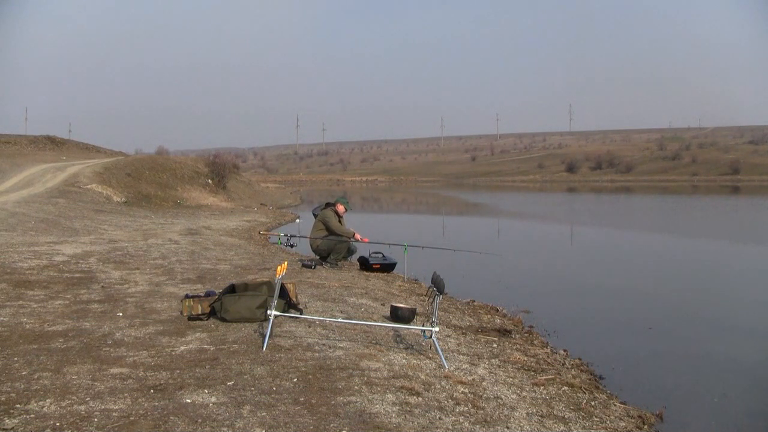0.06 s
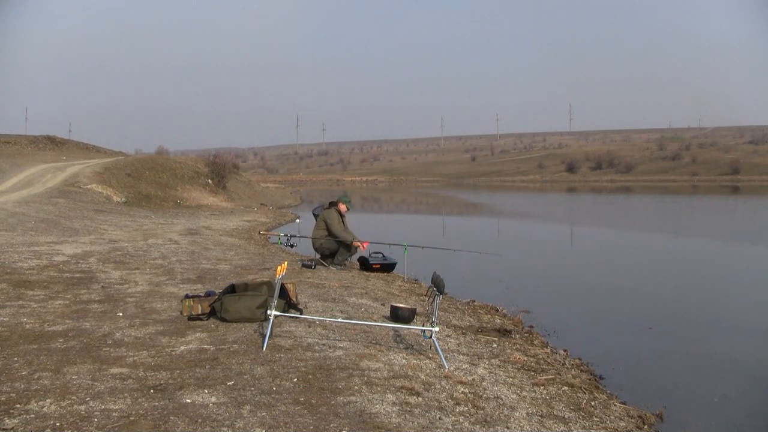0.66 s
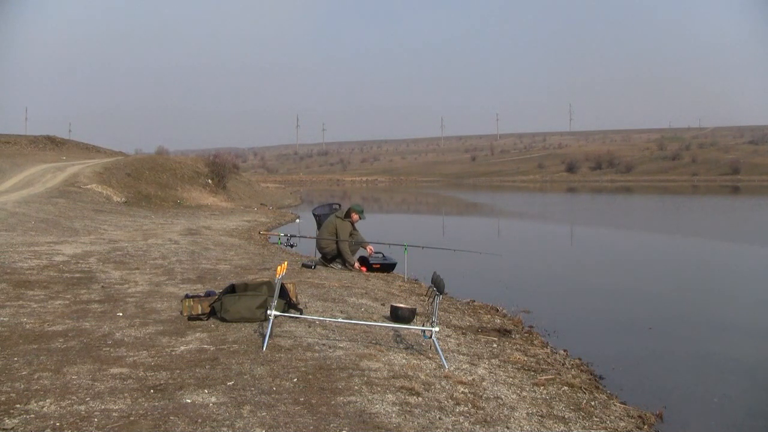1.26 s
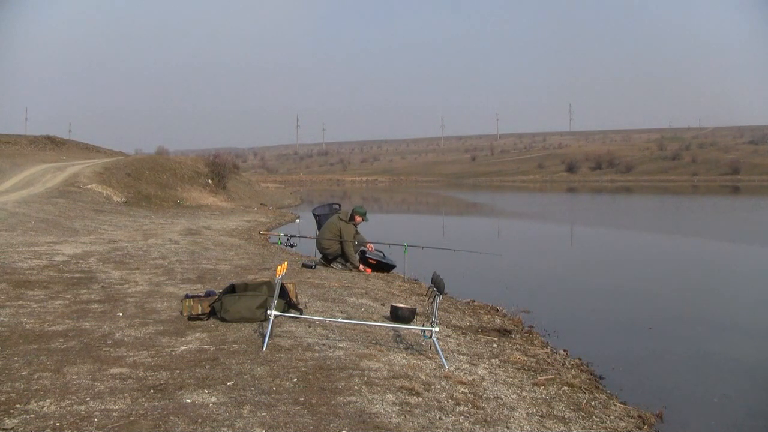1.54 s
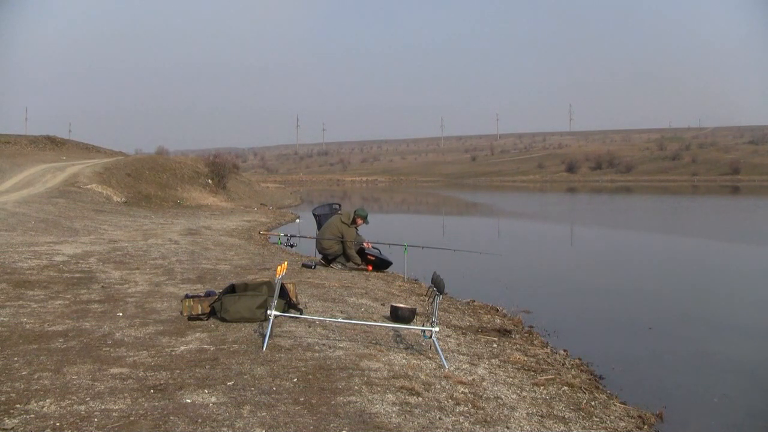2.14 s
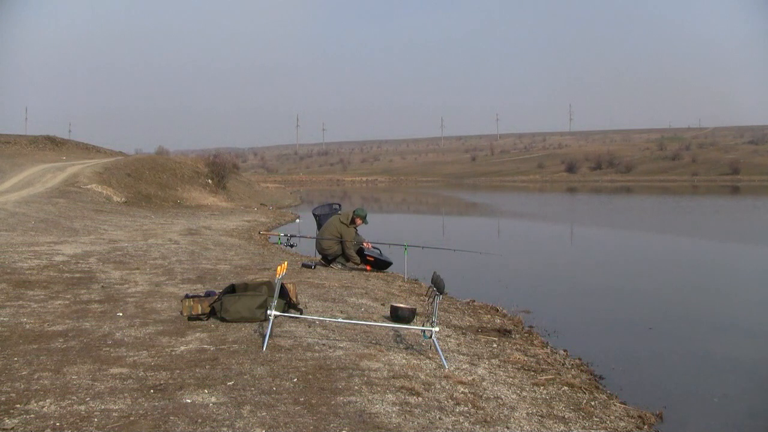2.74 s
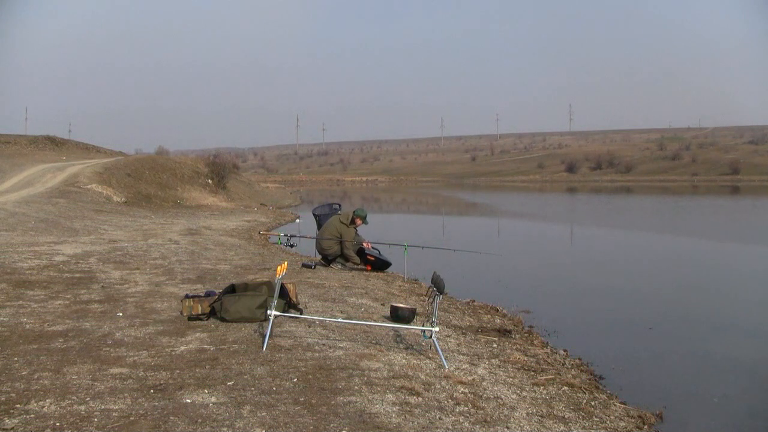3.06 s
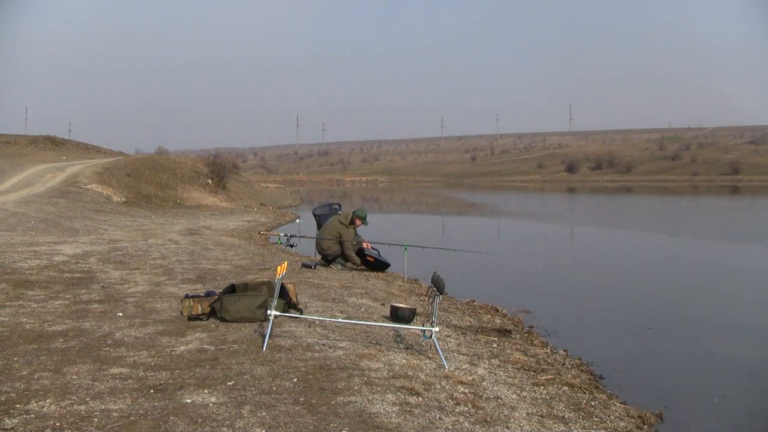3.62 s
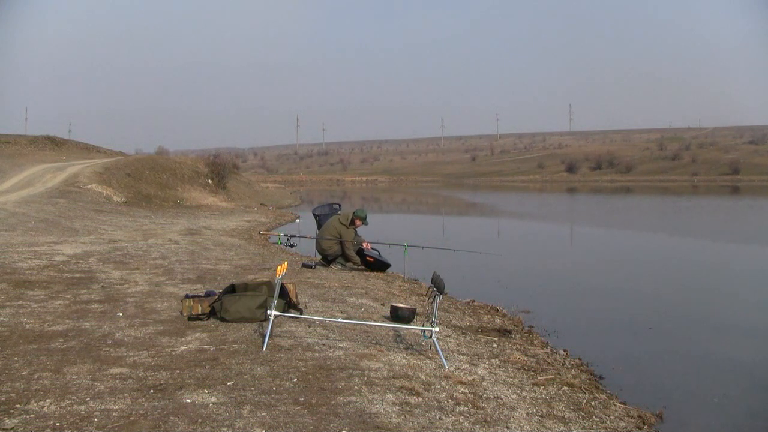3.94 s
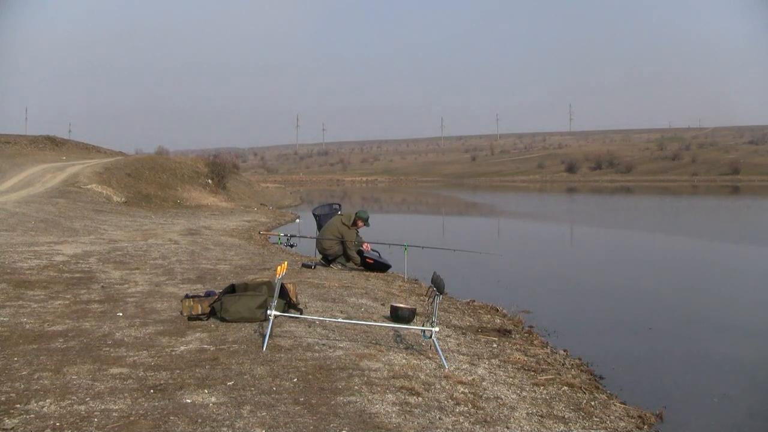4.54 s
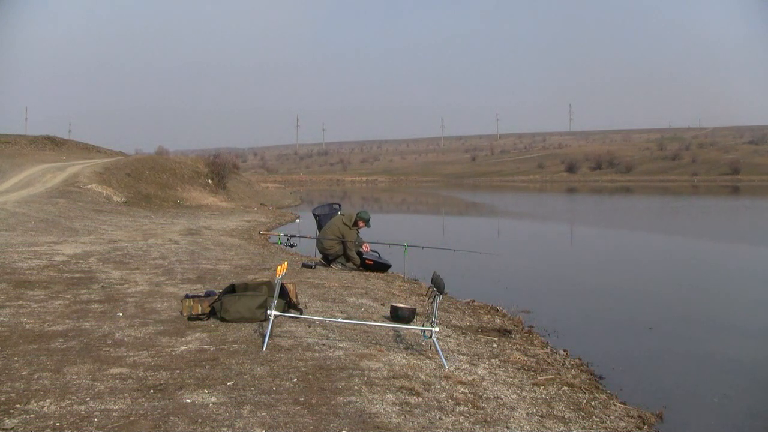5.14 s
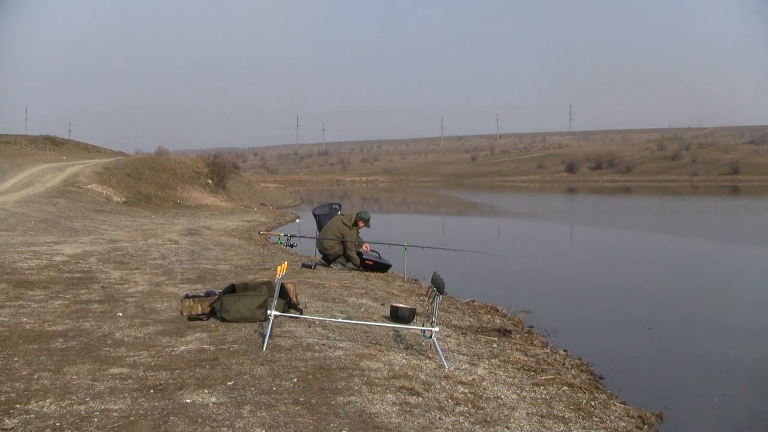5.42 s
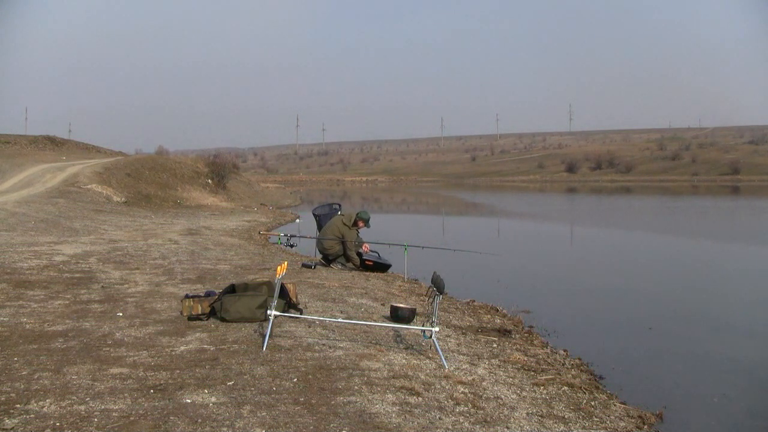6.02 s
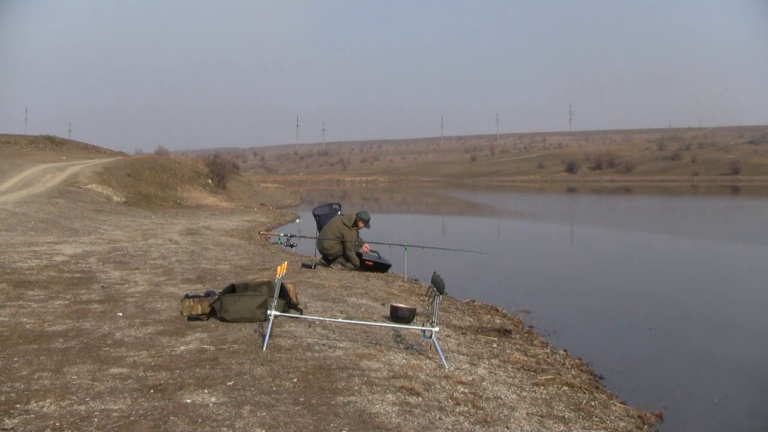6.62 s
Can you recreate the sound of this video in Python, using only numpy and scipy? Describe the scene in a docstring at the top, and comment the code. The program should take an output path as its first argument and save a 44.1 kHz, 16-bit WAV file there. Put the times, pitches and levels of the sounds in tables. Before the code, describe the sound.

A hollow plastic tackle box knocks and clicks some metres away, small parts sliding on its trays, with a soft outdoor hush behind.

```python
"""A light gust brushes the microphone, then things slide and bump softly in a plastic tackle box.
Some metres ahead, an angler crouches by a still pond and rummages: lid and latches snap and rebound,
small parts clack on the trays, and the hollow box rings with each blow and each slip.
Open air gives back only a short scatter from the ground and a faint dull tail, over a soft wide hush."""
import sys
import numpy as np
from scipy import signal
from scipy.fft import rfft, irfft
from scipy.io import wavfile

SR = 44100
rng = np.random.default_rng(int(sys.argv[2]) if len(sys.argv) > 2 else 0)


def master(y):
    """Save y as 16-bit WAV."""
    cut = np.clip(np.atleast_2d(y).T, -1, 1)
    pcm = np.round(cut * 32767)  # scale
    wavfile.write(sys.argv[1], SR, pcm.astype(np.int16))


N = 303408
RING_S = np.arange(SR // 4) / SR  # time axis of one ring

# Lid and latches snapping. Each row: start in seconds, floor thud in dB, wall knock in dB, wall pitch
# in Hz, clack in dB, clack pitch in Hz, tick in dB, factor on ring time, rebound gap in seconds,
# loss per rebound in dB.
SNAPS = [(2.098, -63, -57, 800, -52.5, 3080, -60.5, 1, .009, 14),
         (2.175, -45.5, -38, 624, -55.5, 2740, -63.5, 0.71, .010, 27),
         (2.2143, -41.5, -36.5, 495, -49.5, 4050, -48.5, 0.81, 0.019, 11.5),
         (2.4211, -48.5, -46, 566, -52.5, 3940, -58.5, 0.56, .013, 7),
         (2.857, -78, -72, 900, -75, 2500, -73, 0.46, 0.036, 0),
         (2.924, -54, -28.5, 557, -38.5, 2900, -36, 1, 0.022, 20),
         (3.452, -56, -36.5, 568, -55, 2030, -57, .55, .017, 3.5),
         (3.8014, -59, -37.5, 750, -38.5, 3450, -45, 1, 0.021, 4.5),
         (4.782, -51.5, -45, 610, -55.5, 4320, -61, 1, 0.017, 6)]
# A hand or something soft on the box. Each row: start in seconds, wall knock in dB, wall pitch in Hz.
BUMPS = [(0.55, -58.5, 824), (0.611, -53.5, 604), (0.632, -53.5, 810), (1.365, -60.5, 1490),
         (1.458, -57, 517), (2.567, -44.5, 670), (2.58, -46, 500), (2.795, -53.5, 450), (3.453, -41.5, 314),
         (4.053, -42.5, 540), (4.182, -48, 497), (4.197, -47, 520), (5.718, -56.5, 597),
         (5.791, -53.5, 690), (6.862, -46.5, 660)]
# Small parts dropping on a tray. Each row: start in seconds, clack in dB, part pitch in Hz,
# wall pitch in Hz, tick in dB.
CLACKS = [(1.577, -66.5, 5500, 1000, -74), (2.163, -62, 4050, 640, -70), (2.706, -65, 3200, 600, -69),
          (2.9, -66, 3770, 700, -77), (3.756, -58, 4400, 593, -64), (4.002, -59, 2900, 884, -74),
          (4.071, -61, 2860, 556, -72), (4.208, -57, 3770, 600, -75), (4.218, -47, 4160, 770, -59),
          (4.257, -58, 3800, 500, -73), (4.415, -52, 2800, 835, -70.5), (4.45, -52, 4150, 940, -68),
          (4.4759, -48, 4220, 1000, -63), (4.519, -53, 2550, 920, -67.5), (4.729, -51, 4420, 940, -64.5),
          (4.76, -55, 3750, 744, -69), (4.819, -61, 3900, 520, -74), (5.309, -61, 3600, 750, -78),
          (5.332, -58, 4100, 706, -83), (5.865, -67, 3000, 700, -77), (5.9045, -45, 3050, 760, -70)]
# Things sliding over the trays. Each row: start and end in seconds, then the levels of walls,
# small parts and contact fizz in dB.
SLIDES = [(0.471, 0.68, -66.5, -74.5, -82.5), (2.151, 2.264, -55, -70, -76),
          (2.438, 2.495, -55.5, -72, -78.5), (2.658, 2.785, -58.5, -70.5, -76.5),
          (2.967, 2.99, -52.5, -65.5, -67), (3.03, 3.256, -67.5, -83, -85), (3.521, 3.626, -73, -77, -86),
          (3.729, 3.856, -54.5, -73, -77), (3.803, 3.889, -45, -58, -69), (3.889, 4.17, -59, -77, -86),
          (3.993, 4.103, -51, -64.5, -77), (4.201, 4.296, -57.5, -73, -80), (4.421, 4.542, -54.5, -64, -80),
          (4.73, 4.872, -56.5, -69, -81), (5.301, 5.359, -61.5, -67, -86), (5.779, 5.85, -55, -63, -82)]
# Modes of the hollow box. Each row: frequency in Hz, relative level in dB, t60 in seconds.
BOX_MODES = [(235, -19.5, 0.13), (330, -5, 0.13), (390.6, -6, 0.15), (474, 2, 0.067), (523, -3.5, 0.12),
             (570.3, -8, 0.16), (660.5, -7.5, 0.16), (744, -2.5, 0.09), (842, -6.5, 0.12), (946.4, 0, 0.1),
             (1107, 2.5, 0.056), (1210, -9, 0.14), (1337, 0, 0.047), (1485, -3.5, 0.075), (1664, 0, 0.042),
             (1858, -16.5, 0.2)]
# Modes of trays and small hard parts. Each row: frequency in Hz, relative level in dB, t60 in seconds.
PART_MODES = [(1990, -9.5, 0.033), (2020, 2.5, 0.064), (2695, -2.5, 0.057), (2910, -3, 0.07),
              (3106, -2, 0.05), (3267, -5, 0.022), (3330, -4, 0.064), (3800, 5.5, 0.037),
              (3920, 1.5, 0.014), (4170, -2.5, 0.055), (4350, -4.5, 0.031), (4640, -9.5, 0.047),
              (5180, 0.5, 0.017), (6100, -52, 0.032)]
# The wash of weak, closely spaced tray modes. Each row: frequency in Hz, relative level in dB.
TRAY_SPECTRUM = [(1200, -27), (1900, -1), (2350, -6.5), (2780, 1), (3450, -7.5), (4100, -8), (4700, -11),
                 (5900, -13.5), (7500, -34)]
# Hard contact of plastic on plastic. Each row: frequency in Hz, relative level in dB.
TICK_SPECTRUM = [(2000, -53), (4000, -9), (5700, -6), (6500, -2), (7300, -3.5), (8100, -3), (9200, -8),
                 (10200, -5.5), (11800, -9.5), (13000, -14), (14200, -23), (16000, -44)]
# Gusts at the microphone. Each row: start in seconds, end in seconds, level in dB.
GUSTS = [(.08, .9, -69.5), (5.493, 6.0, -76.5), (5.997, 7.2, -80)]
# Wind rumble on the microphone. Each row: frequency in Hz, relative level in dB.
BREEZE_SPECTRUM = [(20, -5), (50, -19), (80, 6.5), (120, -1.5), (200, -7.5), (500, -45)]
# The hush around the pond. Each row: frequency in Hz, relative level in dB.
HUSH_SPECTRUM = [(15, -42), (25, -21.5), (86, -11), (260, -1), (313, 1.5), (359, 1), (567, 0), (722, -2),
                 (848, -3.5), (3630, -20), (15500, -41)]
# Stereo width of the hush. Each row: frequency in Hz, correlation of left and right.
HUSH_CORRELATION = [(60, 1), (130, 0.13), (290, -0.47), (640, -0.63), (1410, -0.22), (3100, 0.16),
                    (6820, 0.14), (15000, 0.19)]


def snaps(rebounds=3, softening_db=3):
    """Hard plastic snaps home and rebounds, each time with less clack and tick against the knock."""
    out = np.zeros(N)
    for start, thud_db, wall_db, wall_hz, clack_db, part_hz, tick_db, ring, gap_s, loss_db in SNAPS:
        softness_db = 6.5 + wall_db - clack_db
        for k in range(rebounds + 1):
            dull_db = k * softening_db
            hit = blow(thud_db, wall_db, wall_hz, clack_db - dull_db, part_hz, tick_db - dull_db,
                       ring, softness_db)
            add(out, start + k * gap_s, amp(-k * loss_db) * hit)
    return out


def bumps(firm_db=-53.5, thud_db_per_octave=-23.5):
    """Soft blows sound the hollow box and hardly stir its contents."""
    out = np.zeros(N)
    for start, wall_db, wall_hz in BUMPS:
        thud_db = wall_db + thud_db_per_octave * np.log2(wall_hz / 441)  # the floor takes low bumps
        ring = 0.75 * np.exp(-0.7 * max(firm_db - wall_db, 0))  # light touches stay on and damp the box
        hit = blow(thud_db, wall_db, wall_hz, clack_db=wall_db - 21.5, part_hz=2670,
                   tick_db=wall_db - 31, ring=ring, softness_db=19)
        add(out, start, hit)
    return out


def clacks(typical_knock_db=-48.5, typical_clack_db=-49.5):
    """Small hard parts clack at their own pitch, and the box answers with a knock."""
    out = np.zeros(N)
    for start, clack_db, part_hz, wall_hz, tick_db in CLACKS:
        wall_db = typical_knock_db + 0.7 * (clack_db - typical_clack_db)
        thud_db = wall_db - 21
        hit = blow(thud_db, wall_db, wall_hz, clack_db, part_hz, tick_db,
                   ring=0.92, softness_db=4, focus_db=15.5)
        add(out, start, hit)
    return out


def slides(slips_per_s=1100, spread_db=2, thud_db=-9):
    """Sliding parts catch and slip; every slip is a tiny blow on the same box."""
    out, t = np.zeros(N), np.arange(SR // 2) / SR
    for start, end, wall_db, clack_db, fizz_db in SLIDES:
        slipping = rng.random(len(t)) < slips_per_s / SR
        size = np.minimum(rng.exponential(1, len(t)), 3)
        length_s = end - start
        stroke = np.sin(np.pi * np.minimum(t / length_s, 1)).clip(0) ** 0.29
        slips = stroke * slipping * amp(spread_db * size) * rng.choice([-1, 1], len(t))
        floor, walls = box_ring(pitch_hz=644, ring=0.29, softness_db=wall_db - clack_db, focus_db=2.5)
        box = walls + amp(thud_db) * floor
        part = part_ring(pitch_hz=3400, ring=0.41, focus_db=3, wash_focus_db=8)
        fizz = dense_ring(TICK_SPECTRUM, t60=0.022, rise_s=0.0003)
        for db, response in (wall_db, box), (clack_db, part), (fizz_db, fizz):
            rub = signal.fftconvolve(slips, response)
            power = np.sum(rub ** 2) / (length_s * SR)
            add(out, start, amp(db) * rub / np.sqrt(power + 1e-20))
    return out


def blow(thud_db, wall_db, wall_hz, clack_db, part_hz, tick_db, ring, softness_db, focus_db=6):
    """One blow rings floor, walls and a small part, and the contact ticks; ring scales decay times."""
    ring = max(ring, 0.2)
    floor, walls = box_ring(wall_hz, ring, softness_db)
    part = part_ring(part_hz, ring, focus_db, wash_focus_db=0.73 * focus_db)
    tick = dense_ring(TICK_SPECTRUM, t60=0.039 * ring, rise_s=0.0005, tail_db=-38)
    return amp(thud_db) * floor + amp(wall_db) * walls + amp(clack_db) * part + amp(tick_db) * tick


def box_ring(pitch_hz, ring, softness_db, focus_db=6.5, floor_top_hz=430,
             floor_rise_s=0.0039, wall_rise_s=0.0016, push_db=3, push_s=0.0084):
    """Floor and wall modes swell within a few ms, are loudest while the blow pushes, then ring on."""
    hz = np.array(BOX_MODES)[:, 0]
    modes = modes_ring(BOX_MODES, pitch_hz, ring, focus_db, focus_octaves=0.3, detune=0.016)
    modes *= amp(push_db * np.exp(-(RING_S / push_s) ** 4))
    # a soft contact lasts longer and leaves the upper modes weak
    octaves_above = np.log2(hz / pitch_hz).clip(0)
    modes *= amp(-0.29 * max(softness_db, 0) * octaves_above)[:, None]
    floor = modes[hz < floor_top_hz].sum(0) * rise(floor_rise_s)
    walls = modes[hz >= floor_top_hz].sum(0) * rise(wall_rise_s)
    # keeps the knock's onset free of low thump
    low_cut = signal.butter(4, 198, "high", fs=SR, output="sos")
    return unit_onset(signal.sosfilt(low_cut, floor)), unit_onset(signal.sosfilt(low_cut, walls))


def part_ring(pitch_hz, ring, focus_db, wash_focus_db):
    """A small hard part clinks over a short wash from the tray, both lifted near the same pitch."""
    modes = modes_ring(PART_MODES, pitch_hz, ring, focus_db, focus_octaves=0.13, detune=0.01)
    clink = unit_onset(modes.sum(0) * rise(0.00022))
    hz = np.geomspace(1000, 8000, num=60)
    wash_db = curve_at(TRAY_SPECTRUM, hz) + wash_focus_db * nearness(hz, pitch_hz, octaves=0.15)
    wash = dense_ring(np.transpose([hz, wash_db]), t60=0.08 * ring, rise_s=0.0015)
    return unit_onset(clink + 0.7 * wash)


def modes_ring(table, pitch_hz, ring, focus_db, focus_octaves, detune):
    """One decaying sine a mode; the spot struck favours those near one pitch, the grip detunes them."""
    hz, db, t60 = np.transpose(table)[:, :, None]
    shift, uneven_db, phase = rng.standard_normal((3, len(table), 1))
    start_db = db + focus_db * nearness(hz, pitch_hz, focus_octaves) + uneven_db
    envelope = amp(start_db - 60 * RING_S / (t60 * ring))
    return envelope * np.sin(2 * np.pi * (hz * (1 + detune * shift) * RING_S + phase))


def dense_ring(spectrum, t60, rise_s, echo_s=0.0085, echo_db=-13.5, tail_db=-24, tail_t60=0.06):
    """Many close modes die fast; the box lid and the ground throw the sound back a few ms later."""
    modes = coloured(rng.standard_normal(len(RING_S)), spectrum)
    direct = amp(-60 * RING_S / t60)
    echo = amp(echo_db - 60 * abs(RING_S - echo_s) / t60) * (RING_S > echo_s)
    tail = amp(tail_db - 60 * RING_S / tail_t60)
    envelope = np.sqrt(direct ** 2 + echo ** 2 + tail ** 2) * rise(rise_s)
    return unit_onset(modes * envelope)


def pond_bank(direct, scatter_t60=0.04, far_t60=0.92, far_delay_s=0.03):
    """Rough ground scatters sound to the microphone from both sides; the far slope adds a dull tail."""
    t = np.arange(SR // 2) / SR
    near, far = rng.standard_normal((2, 2, len(t)))
    near = near[0] * amp(-60 * t / scatter_t60)
    far = far * amp(-60 * t / far_t60) * (t > far_delay_s)
    side = coloured(near / np.linalg.norm(near),
                    [(200, -9), (1200, -8), (3500, -40), (8000, 8), (12000, 18.5)])
    tail = coloured(far / np.linalg.norm(far[0]), [(300, 4), (1500, -15), (8000, -12)])
    fade_out = np.minimum(1, (t[-1] - t) / 0.05)
    response = amp(-23.5) * (np.array([side, -side]) + tail) * fade_out
    return direct + signal.fftconvolve(direct[None], response, axes=1)[:, :N]


def breeze(calm_db=-84.5, ramp_s=0.16):
    """A light wind flutters at the microphone; each gust swells, holds and drops."""
    shared, *each_side = rng.standard_normal((3, N))
    rumble = unit_rms(coloured(shared + 0.53 * np.array(each_side), BREEZE_SPECTRUM))
    t = np.arange(N) / SR
    gusts = sum(amp(db) * np.clip(np.minimum(t - start, end - t) / ramp_s, 0, 1)
                for start, end, db in GUSTS)
    return np.hypot(amp(calm_db), gusts) * rumble


def hush(level_db=-57, waver_db=1.02):
    """The hush of open country lies wide around the microphone, its level wavering slightly."""
    mid, side = rfft(rng.standard_normal((2, N)))
    correlation = np.clip(curve_at(HUSH_CORRELATION, np.fft.rfftfreq(N, 1 / SR)), -0.95, 0.95)
    mid *= np.sqrt(1 + correlation)
    side *= np.sqrt(1 - correlation)
    air = coloured(irfft([mid + side, mid - side], N), HUSH_SPECTRUM)
    waver = np.interp(np.arange(N), np.linspace(0, N, num=40), rng.standard_normal(40))
    return amp(level_db + waver_db * waver) * unit_rms(air)


def amp(db):
    """Decibels to gain."""
    return 10 ** (np.asarray(db) / 20)


def unit_rms(x):
    """Scales to rms 1."""
    return x / np.sqrt(np.mean(x ** 2) + 1e-20)


def unit_onset(x):
    """Scales a ring so that its first 14 ms have rms 1."""
    return x / np.sqrt(np.mean(x[:round(0.014 * SR)] ** 2) + 1e-20)


def rise(rise_s):
    """The attack of a ring, from 0 towards 1."""
    return 1 - np.exp(-RING_S / rise_s)


def nearness(hz, pitch_hz, octaves):
    """A bell curve that is 1 at the pitch."""
    return np.exp(-(np.log2(hz / pitch_hz) / octaves) ** 2)


def curve_at(points, hz):
    """Reads a table on a log-frequency axis."""
    point_hz, value = np.transpose(points)
    return np.interp(np.log(hz + 1), np.log(point_hz + 1), value)


def coloured(x, spectrum):
    """Filters x by a curve of (Hz, dB) points."""
    hz = np.fft.rfftfreq(x.shape[-1], 1 / SR)
    return irfft(rfft(x) * amp(curve_at(spectrum, hz)), x.shape[-1])


def add(mix, start_s, sound):
    """Mixes a sound in at its start time."""
    part = mix[round(start_s * SR):][:len(sound)]
    part += sound[:len(part)]


def scene():
    """The tackle box some metres straight ahead of the microphone, in open air."""
    tackle_box = snaps() + bumps() + clacks() + slides()
    return pond_bank(tackle_box) + hush() + breeze()


def record(dry, top_hz=15700):
    """The recorder's band limit."""
    lowpass = signal.firwin(511, top_hz, window=("kaiser", 9), fs=SR)
    return signal.oaconvolve(dry, lowpass[None], "same")


dry = scene()
out = record(dry)
master(out)
```